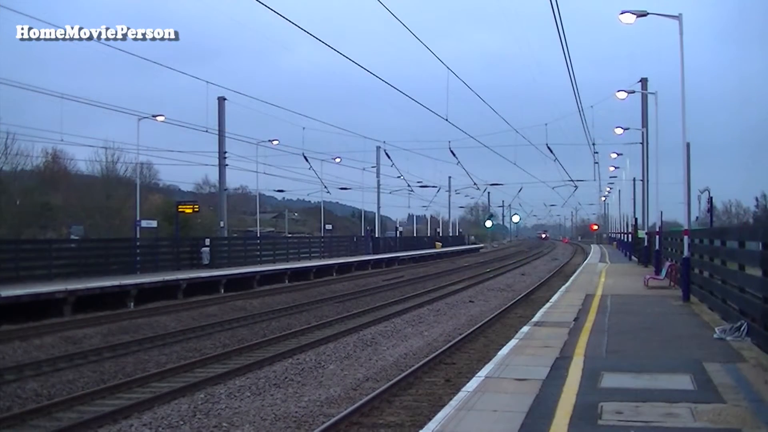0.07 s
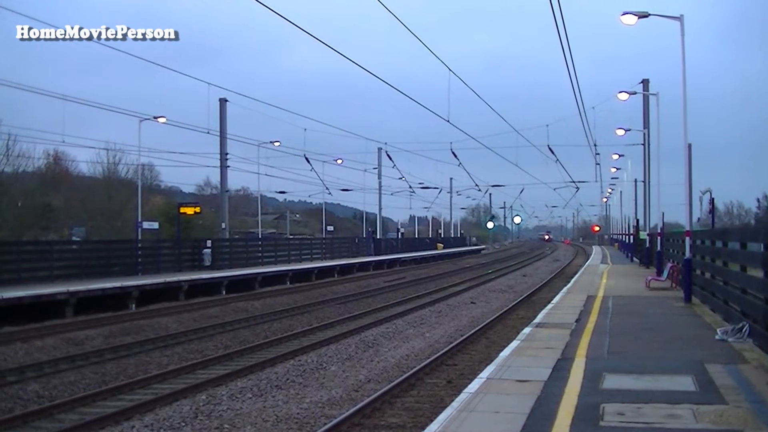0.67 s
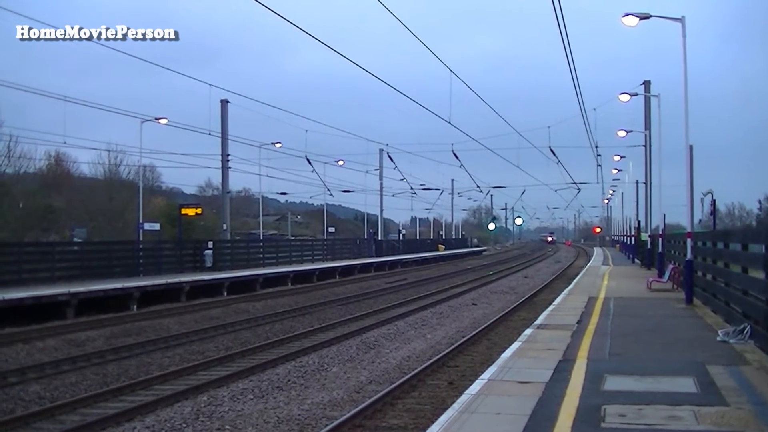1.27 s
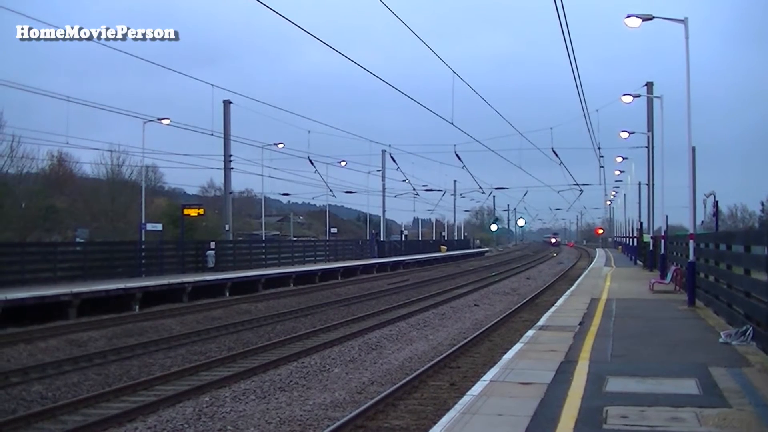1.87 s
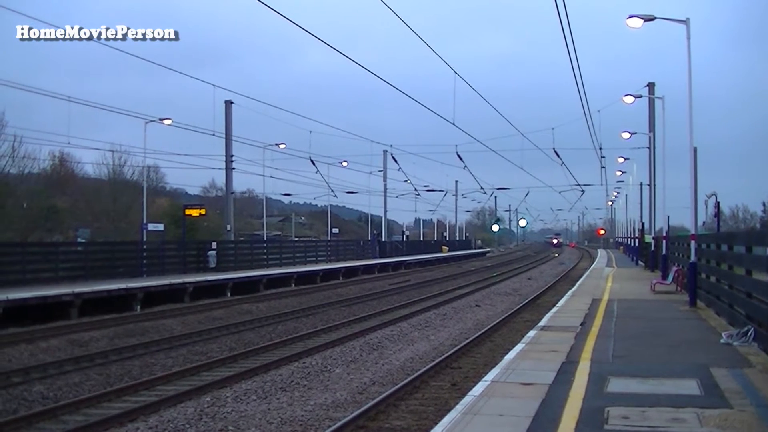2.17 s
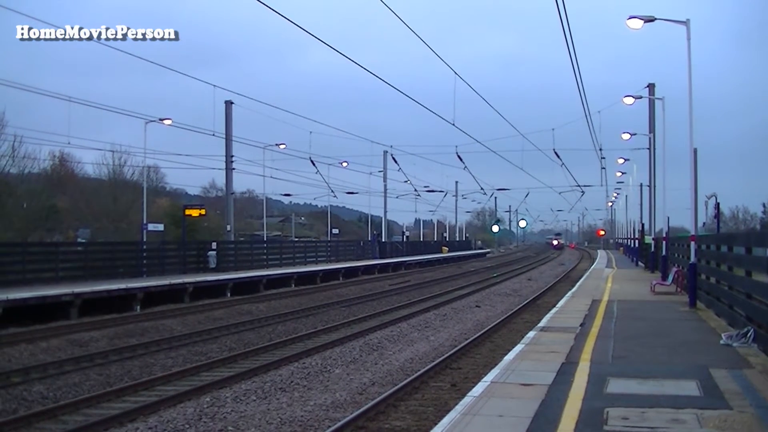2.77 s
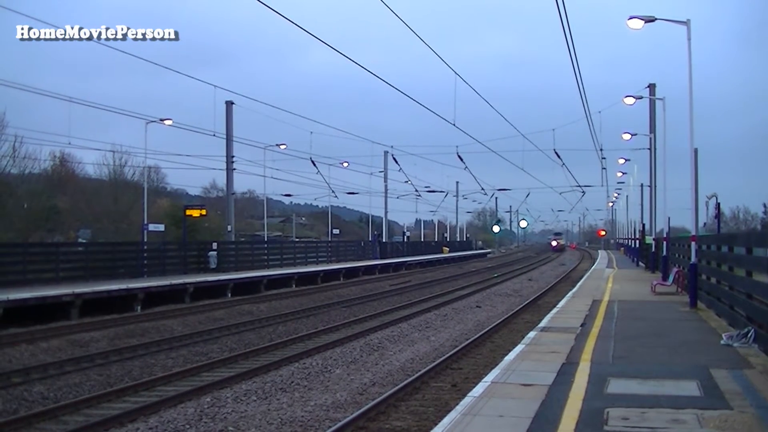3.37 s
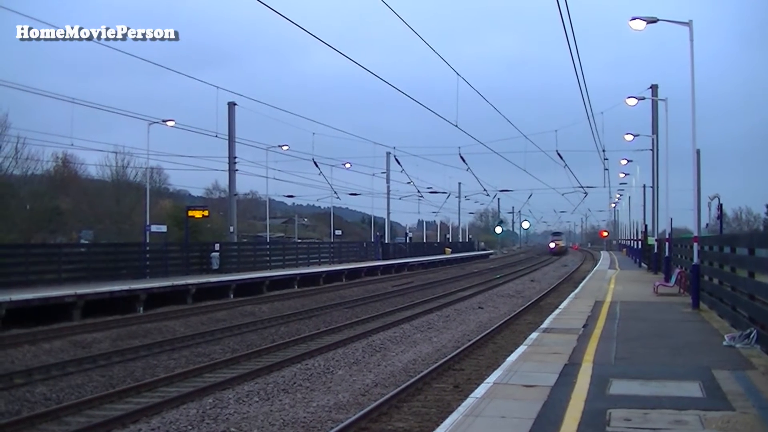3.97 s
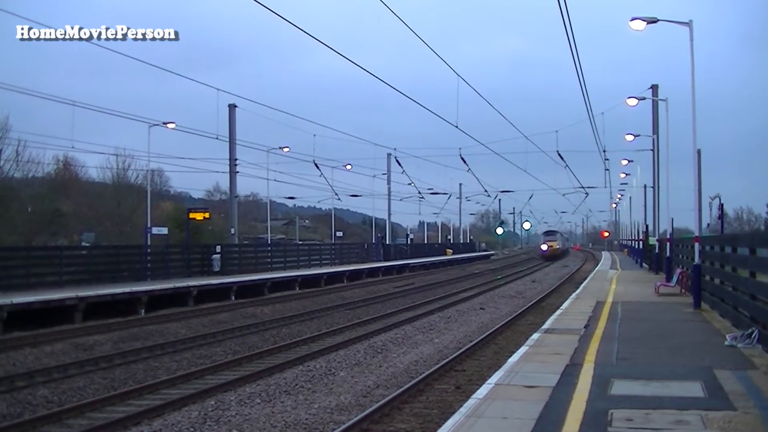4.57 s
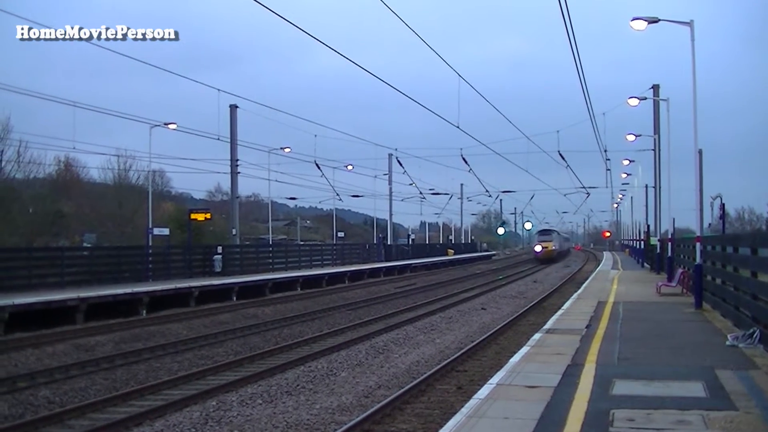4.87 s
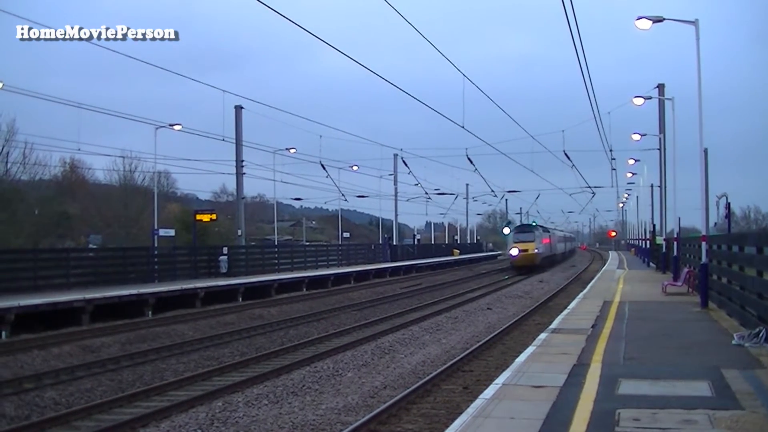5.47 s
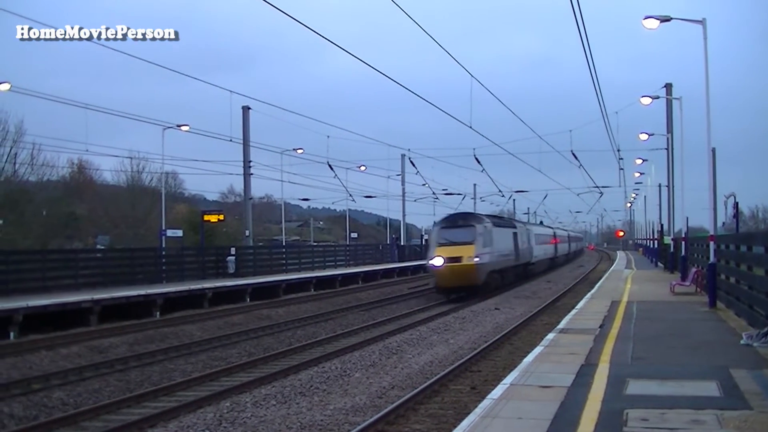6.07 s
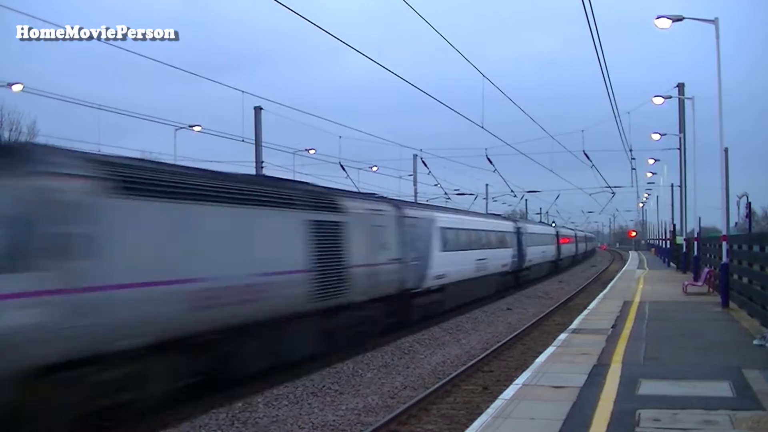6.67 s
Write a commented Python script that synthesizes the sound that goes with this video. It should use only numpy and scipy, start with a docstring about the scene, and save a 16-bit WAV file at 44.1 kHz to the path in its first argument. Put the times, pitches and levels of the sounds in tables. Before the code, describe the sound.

A diesel express train approaches a station platform at high speed. At first the rails carry only a faint, thin rushing with narrow ringing tones and a high sizzle. The wheel noise grows steadily louder and fuller, and the engine's low drone and throb come through in brief swells. Air hiss rises as it closes in on the microphone, a few metres from the track, and the sound stops just before it passes.

```python
"""A station platform, microphone 6.5 m from the track, as a diesel express closes in at 55 m/s.
From far down the line the rails sing ahead of it. Rough wheels make the roar, and because their
roughness repeats with every turn they comb its spectrum; narrow wheel tones ring above it.
Close in, the roar fills out, air hiss rises and the engine's drone and throb come through.
The sound ends just before the nose draws level with the microphone."""
import sys
import numpy as np
from scipy import signal
from scipy.fft import rfft, irfft, next_fast_len
from scipy.io import wavfile

SR = 44100
rng = np.random.default_rng(int(sys.argv[2]) if len(sys.argv) > 2 else 0)


def master(y):
    """Save y as 16-bit WAV."""
    cut = np.clip(np.atleast_2d(y).T, -1, 1)
    pcm = np.round(cut * 32767)  # scale
    wavfile.write(sys.argv[1], SR, pcm.astype(np.int16))


N = 295911
T = np.arange(N) / SR
SPEED_M_S, TRACK_M, PASS_S = 55, 6.5, 6.85  # the nose would draw level at PASS_S, TRACK_M away
SHAFT_HZ = 14.88  # engine shaft rate as heard from far ahead

# Stereo spread at the microphone: (frequency [Hz], side against mid [dB])
STEREO_WIDTH = [(30, -8), (60, -10), (110, -17), (200, -17), (380, -21), (700, -22.5), (1290, -21),
                (2380, -17.5), (4400, -17), (8120, -20.5), (15000, -8)]
# Stereo balance: (frequency [Hz], left against right [dB])
STEREO_LEAN = [(60, 4), (200, 3), (380, 1.5), (700, 0.5), (1290, 0.5), (2380, -1.4), (4400, -0.5),
               (8120, 0.5), (15000, 0.8)]
# Background hiss: (frequency [Hz], relative level [dB])
BACKGROUND_SPECTRUM = [(30, 6), (100, 17), (1000, 25), (5000, -13), (9000, -2), (15500, -3)]
# Rushing air: (frequency [Hz], relative level [dB])
AIR_SPECTRUM = [(3000, -15), (4500, -0.5), (5800, 6.5), (7600, 7), (8300, 4), (9800, 1.5), (11000, -5),
                (13000, -9.5), (15500, -29)]
# Engine notes: (order [multiple of shaft rate], level before distance gain [dB])
ENGINE_NOTES = [(8, -74.5), (10, -83), (11, -67.5)]
# Brief booms of one engine order: (time [s], duration [s], order [multiple of shaft rate], boost [dB])
ENGINE_BOOMS = [(3.0, 0.16, 8, 14), (3.48, 0.35, 8, 12.5), (3.98, 0.44, 8, 9), (4.0, 0.94, 19, 4),
                (4.55, 0.6, 11, 9), (5.45, 0.23, 8, 16), (5.68, 0.55, 11, 15.5), (6.18, 0.36, 11, 11.5),
                (6.45, 0.96, 8, 15)]
# Exhaust throb: (order [multiple of shaft rate], relative level [dB])
EXHAUST_ORDERS = [(17, -8.5), (18, -11.5), (19, -4.5), (20, -5.5), (21, -16), (28, -7), (35, -13.5)]
# Rise of the throb over the approach: (time [s], level [dB])
EXHAUST_LEVEL = [(0, -76), (0.7, -71.5), (0.9, -65.5), (1.6, -62), (2.3, -61.5), (3, -64), (3.6, -55.5),
                 (4.6, -50.5), (5.4, -40), (6, -39.5), (6.3, -45.5), (6.71, -45.5)]
# High waves in the rails: (frequency [Hz], width [Hz], relative level [dB])
RAIL_WAVES = [(3840, 50, -6), (4210, 310, -9.5), (4730, 64, -8.5), (4810, 73, -6), (6840, 50, -19),
              (6980, 120, -10), (7140, 115, -6), (7040, 560, -6)]
# Narrow singing tones of the leading wheels, and at 7322 Hz of the rails: # (frequency [Hz], width [Hz], level
# against ROLL_LEVEL [dB], peak time [s], duration [s])
SINGING_TONES = [(850, 7, -10.5, 4.7, 4.4), (887, 8, -14, 5.3, 2.4), (760, 7, -19, 4.4, 2.5),
                 (1082, 8, -16, 5.8, 1.8), (1278, 7, -17, 5.1, 1.2), (1367, 6, -15.5, 4.3, 1.6),
                 (1385, 7, -15.5, 4.6, 3.6), (1523, 7, -15.5, 1.8, 2.6), (1633, 6, -15.5, 4.8, 2.5),
                 (1668, 7, -14, 3.4, 1.3), (1882, 14, -12, 4, 1.6), (1975, 6, -17.5, 1.2, 3),
                 (2045, 6, -16.5, 1, 2.5), (2492, 9, -16.5, 5.4, 1.4), (2554, 7, -18, 4.4, 2.6),
                 (7322, 14, -25, 4.8, 2.6)]
# Brief swells of single bands in the rolling noise and hiss:
# (time [s], duration [s], frequency [Hz], width [Hz], level against ROLL_LEVEL [dB])
ROAR_SWELLS = [(1.6, 0.37, 2530, 220, -7), (2.2, 0.68, 2800, 450, -12.5), (2.7, 0.24, 1860, 230, -9),
               (3.4, 0.72, 2910, 470, -12), (3.5, 3.6, 13800, 2400, -44), (4.05, .53, 3010, 420, -10),
               (4.1, 1.2, 2515, 400, -4), (4.05, 1, 3440, 450, -22), (4.18, 0.52, 4400, 975, -20.5),
               (4.97, 0.37, 510, 272, -12.5), (5.3, 0.94, 950, 209, -13), (5.87, .45, 2630, 600, -8),
               (6.2, 1, 5800, 300, -31), (6.37, 0.18, 1080, 160, -6), (6.63, 0.16, 1130, 160, -6),
               (6.6, 1.4, 2050, 520, -6)]
# Peaks and dips that colour the roar: (frequency [Hz], width [Hz], far gain [dB], near gain [dB])
ROAR_BANDS = [(310, 320, -1.5, 0.5), (946, 100, 0, 3), (1229, 111, -5.5, -3.5), (1510, 180, 0.5, -1),
              (1813, 39, -3, 6), (2114, 380, -3, -3.5), (2700, 270, -5.5, -4), (3313, 144, 4.5, 4.5),
              (3680, 580, -4.5, -4), (4600, 250, -1, 3)]
# Thin rail-borne roar from far off: (frequency [Hz], relative level [dB])
FAR_SPECTRUM = [(18, -79), (30, -70), (107, -38), (210, -18.5), (281, -15.5), (329, -15), (673, -6),
                (860, -0.5), (1200, -4), (1350, -2), (1920, 0), (2200, -5), (2570, -3.5), (3680, -16),
                (6300, -39), (8190, -66), (13900, -120)]
# Full airborne roar close by: (frequency [Hz], relative level [dB])
NEAR_SPECTRUM = [(18, -80), (30, -58), (80, -59), (103, -30), (157, -18), (192, -15.5), (287, -18.5),
                 (329, -11), (673, -4.5), (860, 0), (1200, -1), (2460, -0.5), (3370, -7), (3680, -12),
                 (6300, -25.5), (8190, -48), (13900, -120)]
# Rise of the rolling noise over the approach: (time [s], level [dB])
ROLL_LEVEL = [(0, -55), (0.35, -50.5), (1.15, -46), (1.6, -42.5), (2.3, -41.0), (3, -37.5), (3.7, -33.5),
              (4.25, -29.5), (4.7, -28), (5.3, -24.5), (6.15, -24.0), (6.71, -24)]


def amp(db):
    """Decibels to amplitude."""
    return 10 ** (np.asarray(db) / 20)


def unit_rms(x):
    """Scales to rms 1."""
    return x / np.sqrt(np.mean(abs(x) ** 2) + 1e-30)


def curve(rows):
    """A time table at every sample."""
    return np.interp(T, *np.transpose(rows))


def spectrum_db(rows, hz):
    """A spectrum table read on a log-frequency axis."""
    table_hz, db = np.transpose(rows)
    return np.interp(np.log(hz + 1), np.log(table_hz + 1), db)


def bell(x, centre, width):
    """A hump of height 1 and the given width at half height."""
    return np.exp2(-np.minimum((2 * (x - centre) / width) ** 2, 40))


def stereo_noise(gain):
    """Two nearly alike channels of noise, rms 1; gain is a function of frequency."""
    size = next_fast_len(N, True)
    hz = np.fft.rfftfreq(size, 1 / SR)
    a, b, c, d = rng.standard_normal((4, len(hz)))
    mid = a + 1j * b
    side = (c + 1j * d) * amp(spectrum_db(STEREO_WIDTH, hz))
    lean = amp(spectrum_db(STEREO_LEAN, hz) / 2)
    channels = np.array([(mid + side) * lean, (mid - side) / lean])
    return unit_rms(irfft(gain(hz) * channels, size)[:, :N])


def flutter(width_hz, count=1024):
    """A slow wander of rms 1."""
    hz = np.fft.rfftfreq(count, T[-1] / count)
    wander = irfft(rfft(rng.standard_normal(count)) * bell(hz, 0, width_hz))
    return np.interp(T, np.linspace(0, T[-1], count), unit_rms(wander))


def ripple(hz, spacing_hz, count=40):
    """Many small resonances at chance places: a ripple of rms 1 along frequency."""
    spacings = spacing_hz * np.geomspace(1, 8, count)
    grid = np.linspace(0, SR / 2, 4096)
    waves = np.sin(2 * np.pi * (grid[:, None] / spacings + rng.random(count)))
    return np.interp(hz, grid, unit_rms(waves.sum(1)))


def distance():
    """Metres from the microphone to the nose of the train."""
    return np.hypot(SPEED_M_S * (PASS_S - T), TRACK_M)


def nearness(handover_m=130, blend_m=43):
    """Near 0 while only the rails carry the sound, near 1 once the full roar arrives through the air."""
    return 1 / (1 + np.exp((distance() - handover_m) / blend_m))


def doppler_time():
    """The power car's clock as heard from the platform, in seconds: pitch sags as it draws level."""
    ahead_m = SPEED_M_S * (PASS_S - T)
    mach = SPEED_M_S / 343
    pitch_ratio = (1 - mach) / (1 - mach * ahead_m / distance())
    return np.cumsum(pitch_ratio) / SR


def background(level_db=-48, growth=0.4, waver_db=0.5, waver_hz=9):
    """Faint, slightly wavering hiss that swells more slowly than the roar."""
    gain = amp(level_db + growth * curve(ROLL_LEVEL) + waver_db * flutter(waver_hz))
    return gain * stereo_noise(lambda hz: amp(spectrum_db(BACKGROUND_SPECTRUM, hz)))


def air_hiss(far_db=-36.5, near_boost_db=21, wiry_db=1.8, flicker_db=1.0, flicker_hz=9):
    """Rushing air and wiry wheel hiss carry only at short range; the high hiss flickers slightly."""
    hiss = stereo_noise(lambda hz: amp(spectrum_db(AIR_SPECTRUM, hz) + wiry_db * ripple(hz, 60)))
    level_db = curve(ROLL_LEVEL) + far_db + near_boost_db * nearness() ** 1.3
    return amp(level_db + flicker_db * flutter(flicker_hz)) * hiss


def engine_order(order, waver_rad, waver_hz=6):
    """One wavering multiple of the shaft rate, of rms 1 except where it booms out."""
    shaft_phase = 2 * np.pi * SHAFT_HZ * doppler_time()
    boom_db = sum(db * bell(T, at, lasting) for at, lasting, k, db in ENGINE_BOOMS if k == order)
    return np.sqrt(2) * amp(boom_db) * np.cos(order * shaft_phase + waver_rad * flutter(waver_hz))


def diesel_drone(reference_m=103, spread_m=50):
    """The firing note and low drone grow as the train nears, levelling off inside spread_m."""
    notes = sum(amp(db) * engine_order(order, waver_rad=0.3) for order, db in ENGINE_NOTES)
    return notes * reference_m / np.hypot(distance(), spread_m)


def exhaust_throb(near_db=-3):
    """Orders locked to the shaft add up to one throb a turn; close by, it softens into a rumble."""
    blur = nearness() ** 2
    throb = sum(amp(db) * engine_order(order, 0.24 + 0.48 * blur) for order, db in EXHAUST_ORDERS)
    return amp(curve(EXHAUST_LEVEL) + near_db * blur) * throb


def rail_whistle(level_db=-70, peak_s=5.26, lasting_s=2.26):
    """The highest rail wave: a thin whistle that the air hiss covers in the end."""
    band = stereo_noise(lambda hz: bell(hz, 11540, 280))
    return amp(level_db) * np.sqrt(bell(T, peak_s, lasting_s)) * band


def rail_sizzle(level_db=-7.5, growth=1.332, near_db=-9, ripple_db=2.0):
    """High waves run far ahead inside the rails; they outgrow the roar, then fall behind it close by."""
    def bands(hz):
        power = sum((amp(db) * bell(hz, centre, width)) ** 2 for centre, width, db in RAIL_WAVES)
        return amp(ripple_db * ripple(hz, 45)) * np.sqrt(power)

    return amp(level_db + growth * curve(ROLL_LEVEL) + near_db * nearness() ** 2) * stereo_noise(bands)


def singing_tones(steady=0.75, fuzz=0.62):
    """The leading wheels, and at 7.3 kHz the rails, sing narrow fuzzy tones, each standing out for a stretch of
    the approach."""
    clock = doppler_time()
    tones = np.zeros(N)
    for hz, width, db, at, lasting in SINGING_TONES:
        envelope = amp(db) * bell(T, at, lasting) * (steady + fuzz * flutter(width))
        tones += envelope * np.cos(2 * np.pi * hz * clock)
    return np.sqrt(2) * amp(curve(ROLL_LEVEL)) * tones


def tread_comb(hz, turn_s, memory):
    """Power comb of a tread that repeats part of its roughness on each turn."""
    return (1 - memory ** 2) / (1 + memory ** 2 - 2 * memory * np.cos(2 * np.pi * hz * turn_s))


def treads(hz):
    """Large power-car wheels comb the middle range, smaller coach wheels the range above."""
    large = bell(hz, 1400, 1300) * (tread_comb(hz, turn_s=0.0561, memory=0.62) - 1)
    small = bell(hz, 2900, 1300) * (tread_comb(hz, turn_s=0.04892, memory=0.68) - 1)
    return np.sqrt(1 + 0.4 * large + 0.62 * small)


def wheel_ring(relative_db=-14):
    """The coach wheels ring in one band that grows with the rolling noise."""
    band = stereo_noise(lambda hz: treads(hz) * bell(hz, 2540, 400))
    return amp(curve(ROLL_LEVEL) + relative_db) * band


def roar_swells():
    """Single bands of the rolling noise and hiss swell briefly, in the centre of the stereo image."""
    size = next_fast_len(N, True)
    hz = np.fft.rfftfreq(size, 1 / SR)
    roar_spectrum = rfft(rng.standard_normal(size)) * np.sqrt(treads(hz))
    swells = np.zeros(N)
    for at, lasting, centre, width, db in ROAR_SWELLS:
        band = unit_rms(irfft(roar_spectrum * bell(hz, centre, width), size)[:N])
        swells += amp(db) * bell(T, at, lasting) * band
    return amp(curve(ROLL_LEVEL)) * swells


def rolling_roar(far_db=0.42, near_db=0.53):
    """Rough wheels roar on the rails; the full near roar takes over from the thin far singing."""
    def far_gain(hz):
        colour_db = sum(db * bell(hz, centre, width) for centre, width, db, _ in ROAR_BANDS)
        return treads(hz) * amp(spectrum_db(FAR_SPECTRUM, hz) + colour_db)

    def near_gain(hz):
        colour_db = sum(db * bell(hz, centre, width) for centre, width, _, db in ROAR_BANDS)
        return np.sqrt(treads(hz)) * amp(spectrum_db(NEAR_SPECTRUM, hz) + colour_db)

    far = amp(far_db) * np.sqrt(1 - nearness()) * stereo_noise(far_gain)
    near = amp(near_db) * np.sqrt(nearness()) * stereo_noise(near_gain)
    return amp(curve(ROLL_LEVEL)) * (far + near)


def scene():
    """Wheels, rails, air and engine as they reach the platform."""
    wheels = rolling_roar() + roar_swells() + wheel_ring() + singing_tones()
    rails = rail_sizzle() + rail_whistle()
    return wheels + rails + air_hiss() + diesel_drone() + exhaust_throb() + background()


def record(dry):
    """The microphone chain passes nothing much above 15.5 kHz."""
    lowpass = signal.firwin(511, 15500, window=("kaiser", 9), fs=SR)
    return signal.oaconvolve(dry, lowpass[None], "same")


dry = scene()
out = record(dry)
master(out)
```